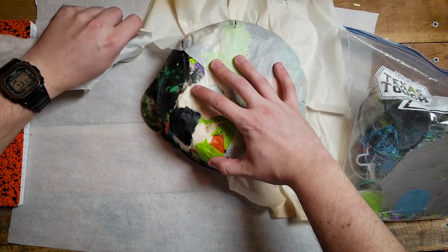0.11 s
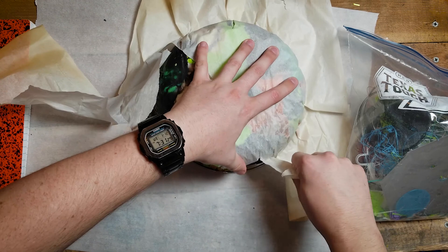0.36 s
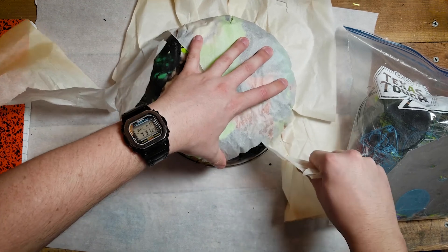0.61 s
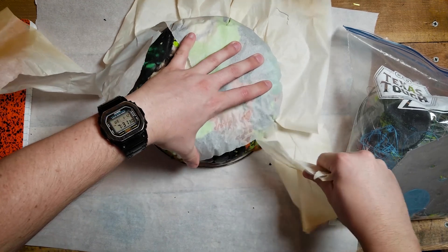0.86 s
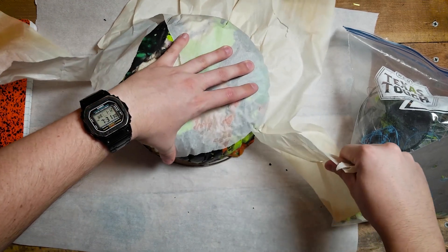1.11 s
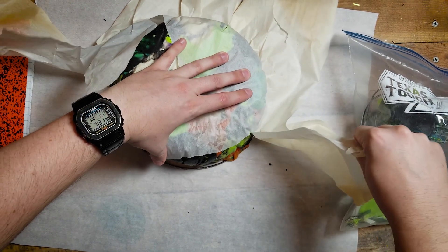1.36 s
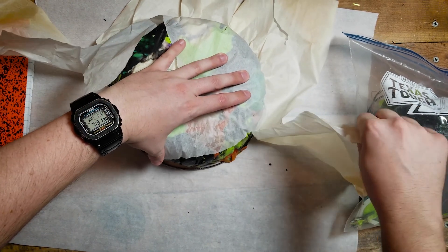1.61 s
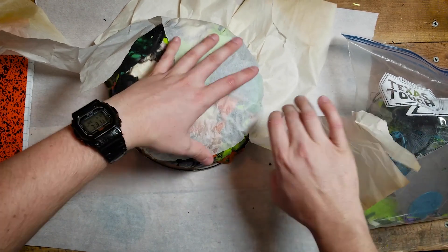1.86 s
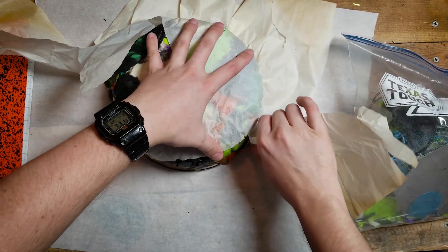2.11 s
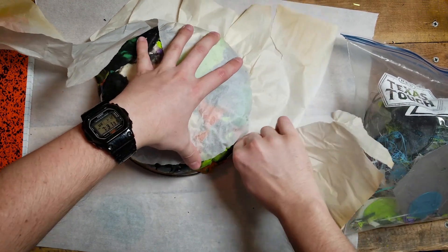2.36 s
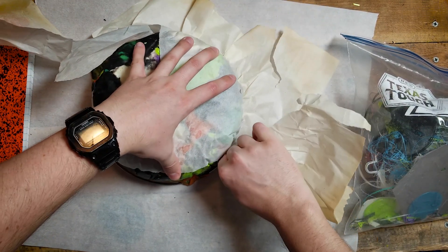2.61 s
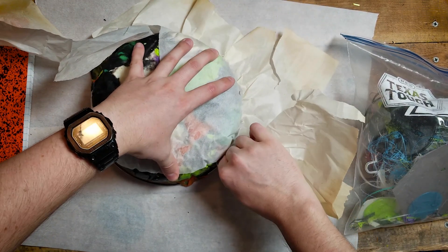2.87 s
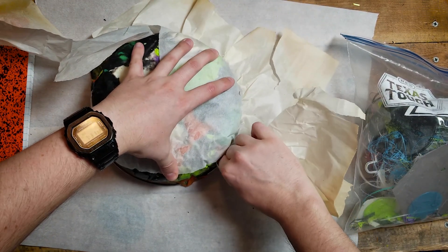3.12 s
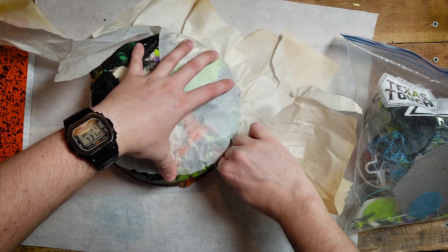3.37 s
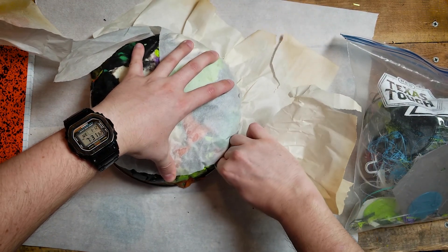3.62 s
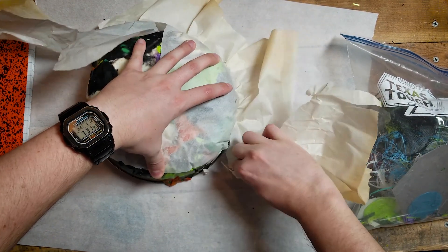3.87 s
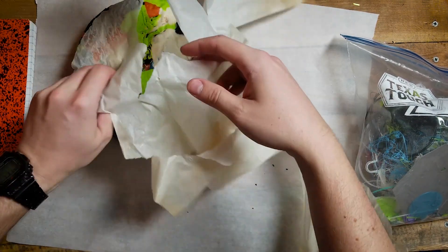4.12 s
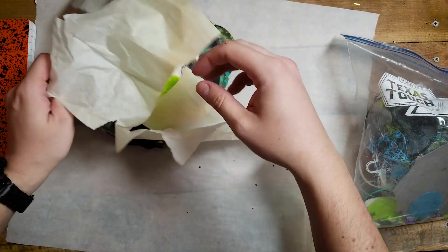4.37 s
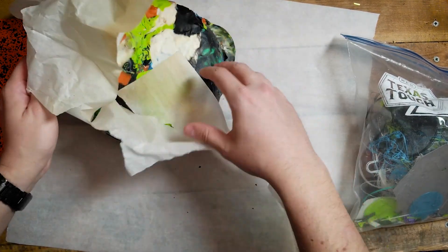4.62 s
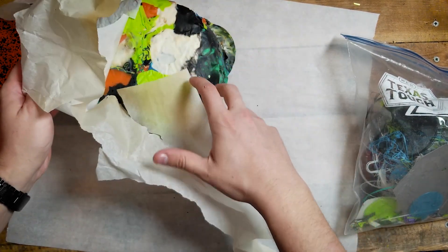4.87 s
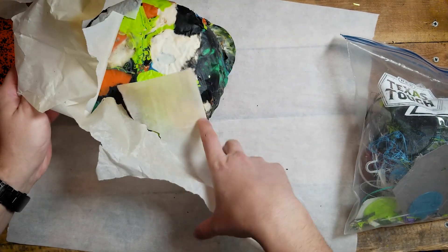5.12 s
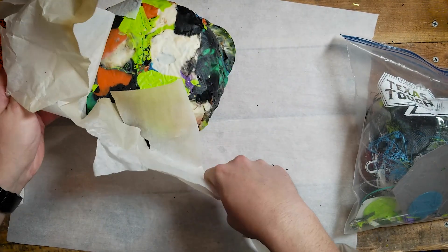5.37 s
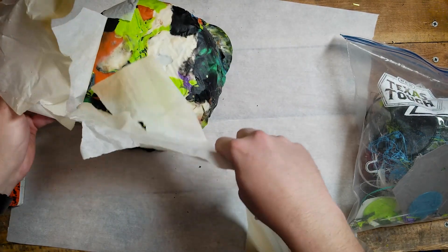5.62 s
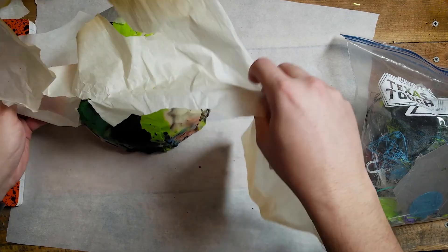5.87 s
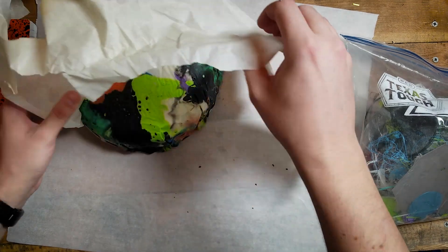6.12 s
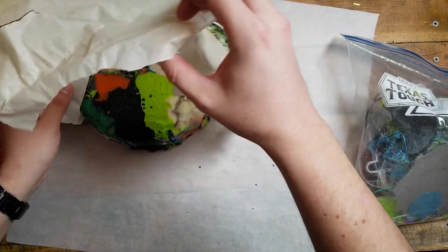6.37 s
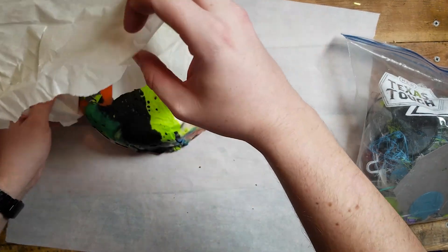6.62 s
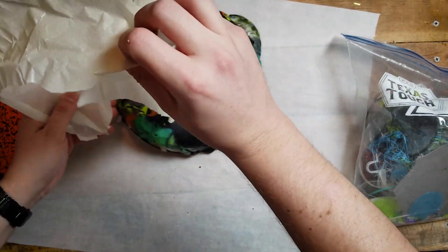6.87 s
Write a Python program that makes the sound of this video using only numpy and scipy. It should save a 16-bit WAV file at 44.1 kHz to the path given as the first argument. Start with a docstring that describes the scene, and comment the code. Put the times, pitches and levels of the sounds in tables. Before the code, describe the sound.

Close, dry paper crinkling with bright snaps and one very loud crack, plus faint low bumps of a bowl shifting on a wooden table.

```python
"""Stiff baking paper is peeled by hand off a hard plastic bowl on a wooden table, heard close up.
Clear snaps and dense crackle: each snap is a pop of a ringing flat facet plus a bright noise tick of the fold.
The bowl slips in jerks that ring low table modes; twice its wall hums as a wavering sine.
Sparse decaying taps add a short room tail to the paper; shaped noise is the still air."""
import sys
import numpy as np
from scipy import signal
from scipy.fft import rfft, irfft, next_fast_len
from scipy.io import wavfile
from scipy.ndimage import uniform_filter1d

SR = 44100
rng = np.random.default_rng(int(sys.argv[2]) if len(sys.argv) > 2 else 0)


def dump_mix(stems):
    """Bounce the given channels to the path in sys.argv[1] as a 16-bit WAV at rate SR."""
    frames = np.atleast_2d(stems).T  # one column per channel
    limited = np.clip(frames, -1, 1)  # hard clip at full scale
    pcm = np.round(limited * 32767).astype(np.int16)
    wavfile.write(sys.argv[1], SR, pcm)


def nominal_scale(level):
    """Amplitude ratio for a level in decibels (scalar or array-like)."""
    x = np.asarray(level, float) / 20
    return 10 ** x


N = 307818

# tugs of the hand, each freeing a crowd of small snaps: (start [s], hold [s], effort [dB], ticks over pops [dB])
HAND_TUGS = [(0.0, 0.042, -31.5, 3.5), (0.125, 0.061, -33, -0.5), (0.288, 0.028, -39.5, 4.5),
             (0.349, 0.076, -29, 2), (0.398, 0.055, -23, 2), (0.487, 0.065, -23, 0.5),
             (0.628, 0.22, -27, 0.5), (0.832, 0.096, -27.5, 0), (0.922, 0.098, -28, 3),
             (1.072, 0.043, -31, 1), (1.163, 0.053, -30, 2.5), (1.273, 0.12, -30.5, 6),
             (1.477, 0.032, -35.5, 4), (1.61, 0.05, -32.5, 1), (1.723, 0.095, -40, -0.5),
             (1.886, 0.13, -65, 14), (1.979, 0.055, -32, -3.5), (2.136, 0.055, -28.5, -1.5),
             (2.254, 0.1, -31.5, -1), (2.381, 0.15, -29.5, -2), (2.583, 0.032, -34, -3.5),
             (2.815, 0.051, -47, -11), (2.932, 0.087, -46, -3.5), (3.108, .03, -45, 4),
             (3.289, .03, -38.5, -17), (3.32, 0.053, -44.5, -19), (3.48, 0.037, -53, 8),
             (3.586, 0.059, -45.5, -3), (3.694, .04, -32, -2), (3.747, 0.048, -17, 0.5),
             (3.928, 0.063, -37.5, -3.5), (4.024, 0.045, -30, -1), (4.09, 0.077, -33, 3),
             (4.177, 0.037, -33, -2), (4.239, 0.12, -31, 2.5), (4.4, 0.1, -42.5, 0.5),
             (4.546, 0.04, -39.5, -2), (4.607, 0.018, -38.5, 4.5), (4.68, 0.098, -40.5, 2.5),
             (4.898, 0.066, -43, 1.5), (4.978, 0.13, -37, 8), (5.143, .15, -34.5, 2.5),
             (5.296, 0.21, -34.5, 3), (5.533, 0.042, -42.5, 6), (5.65, 0.02, -33, -3),
             (5.71, 0.079, -31.5, 2), (5.853, 0.045, -34.5, 1), (5.943, 0.041, -31, 2),
             (6.055, 0.047, -39.5, 0.5), (6.171, 0.072, -30, 3), (6.308, 0.085, -29, 3),
             (6.442, 0.27, -30.5, 3), (6.597, 0.033, -21, 0), (6.705, .08, -34, -0.5),
             (6.822, .17, -32.5, 1)]
# slack of the sheet, favours wide facets over small: (time [s], wide-facet gain [dB])
SHEET_SLACK = [(0.0, 6.5), (.2, -5.5), (.5, 3.5), (1.0, 5), (1.4, 5.5), (1.7, 6.5), (2.1, -6), (2.22, -15),
               (2.3, 7), (2.4, -7), (2.6, -1), (3.0, -2), (3.35, 1), (3.6, -4.5), (4.1, -3), (4.33, 1),
               (4.6, -7), (5.0, -10), (5.3, -3), (5.6, -5), (5.8, -10), (6.1, -8.5), (6.5, -1), (6.98, 0)]
# sharpness of the crease, favours bright ticks over dull: (time [s], tilt [dB])
CREASE_SHARPNESS = [(0.0, -4), (1.3, 3.5), (1.7, -4.5), (2.6, 1.5), (3.2, -1), (3.25, 8), (3.35, -8),
                    (3.66, -4), (3.72, 8), (3.84, 1), (4.0, -2), (6.98, -3.5)]
# borders between wide, middle and small facets: (pitch [Hz])
FACET_BORDERS_HZ = [870, 2500]
# colour of paper and microphone together: (frequency [Hz], gain [dB])
PAPER_COLOUR = [(40, -43), (150, -26.5), (250, -17), (340, -10.5), (480, -6.5), (900, -3.5), (1900, 3.5),
                (2700, 0.5), (3700, 3), (4900, 0.5), (7000, -0.5), (11000, -1.5), (15500, -1.5)]
# shoves of the bowl over the table: (start [s], hold [s], rumble [dB])
BOWL_SHOVES = [(.39, .06, -67), (.48, 0.037, -63), (.61, .04, -55), (.72, 0.056, -59), (.94, 0.027, -48),
               (1.01, 0.014, -39), (1.17, .03, -49), (1.22, .02, -45), (1.28, .02, -44), (1.44, 0.015, -51),
               (1.51, 0.016, -57), (1.63, 0.043, -50), (2.46, 0.044, -54), (3.74, 0.052, -51),
               (4.03, 0.018, -49), (4.24, 0.075, -55), (4.75, .05, -55), (5.65, 0.023, -62),
               (6.33, 0.083, -55), (6.51, 0.04, -55), (6.61, 0.035, -49), (6.73, 0.021, -33),
               (6.8, .03, -41.5), (6.87, 0.017, -36)]
# modes of the table top: (frequency [Hz], width [Hz], relative level [dB])
TABLE_MODES = [(55, 20, -4), (109, 20, 1), (136, 16, -6), (174, 16, -4), (262, 22, -6)]
# spectrum of the still air: (frequency [Hz], relative density [dB per Hz])
AIR_SPECTRUM = [(30, -30), (60, 5), (100, -16), (300, 11), (1000, 9), (4000, 1), (15000, -20)]
# room decay: (frequency [Hz], t60 [s])
ROOM_DECAY = [(400, 0.27), (1500, 0.097), (4000, 0.16), (12000, 0.071)]
# clear snaps, peaks before colouring: (time [s], facet pitch [Hz], pop peak [dB], tick peak [dB])
CLEAR_SNAPS = [(0.117, 1440, -21.5, -12), (0.28, 2110, -26, -18), (0.301, 4480, -31, -11),
               (0.39, 1410, -5.5, -6), (0.418, 1600, -5, -3), (0.511, 1540, -10.5, -13),
               (0.525, 1750, -10, -1), (0.638, 1740, -8, -3), (0.694, 2030, -14, -24),
               (0.743, 1700, -7.5, -5), (0.866, 585, -3.5, -17), (0.893, 1620, -7, -1.5),
               (0.953, 1380, -14, -8), (0.983, 1110, -11, -1.5), (0.99, 1970, -23, -10),
               (1.031, 670, -14, -12), (1.098, 4000, -16, -9), (1.154, 1470, -17, -10),
               (1.168, 526, -10, -6.5), (1.187, 497, -7.5, -9), (1.229, 1650, -12, -10),
               (1.281, 840, -2.5, -5), (1.362, 530, -5, -17), (1.444, 514, -14.5, -42),
               (1.585, 2230, -19.5, -13), (1.653, 3200, -13, -8.5), (1.703, 1690, -20, -11),
               (1.741, 2990, -29, -12), (1.807, 2340, -17.5, -17), (1.936, 2370, -29, -17.5),
               (2.03, 1980, -15.5, -14), (2.115, 3620, -21.5, -22.5), (2.159, 3400, -19, -17),
               (2.261, 3550, -17, -12), (2.286, 780, -9, -19), (2.302, 850, -8.5, -12),
               (2.325, 840, -13, -14), (2.348, 3760, -7, -17), (2.419, 1600, -8.5, -12),
               (2.463, 1960, -14.5, -35), (2.59, 3800, -16.5, -22), (2.624, 2080, -13.5, -22),
               (2.685, 3520, -15, -16), (2.7, 2040, -14, -44), (2.77, 3600, -12.5, -23),
               (2.786, 2070, -19, -14), (2.845, 1780, -27, -24.5), (2.931, 2000, -19, -20),
               (3.069, 3500, -26, -17), (3.075, 3530, -21, -21), (3.104, 2300, -16.5, -23),
               (3.117, 2030, -10.5, -16), (3.147, 1980, -19.5, -31), (3.245, 4140, -19.5, -7.5),
               (3.277, 2290, -14, -27), (3.287, 3280, -18, -19), (3.402, 3460, -10.5, -13),
               (3.443, 3980, -20, -36), (3.466, 2100, -5.5, -14.5), (3.526, 1880, -25, -24),
               (3.581, 3900, -11, -28), (3.685, 2070, -21, -41), (3.692, 3300, -12, -16),
               (3.703, 3680, -9, -2.5), (3.721, 3940, -14, -16), (3.744, 1210, -0.5, 0),
               (4.028, 2020, -12, -17), (4.058, 1220, -22, -11), (4.114, 3600, -8, -16),
               (4.168, 1910, -17.5, -20), (4.248, 1060, -29, -17), (4.319, 1070, -18.5, -9),
               (4.355, 2040, -23, -15), (4.615, 3200, -9.5, -16.5), (4.829, 1980, -22.5, -15),
               (4.918, 1830, -22.5, -14.5), (4.98, 3340, -23, -16.5), (5.012, 3420, -17, -13),
               (5.039, 2970, -19, -18), (5.067, 1440, -25, -10), (5.075, 1870, -16, -16),
               (5.092, 1830, -26, -17), (5.123, 3060, -23, -19), (5.155, 2020, -34, -11.5),
               (5.208, 3870, -12, -6.5), (5.25, 2020, -26, -15), (5.286, 3000, -17, -8.5),
               (5.327, 3560, -15.5, -10.5), (5.36, 2980, -22, -16), (5.375, 3460, -5.5, -5.5),
               (5.405, 3270, -11.5, -33), (5.428, 3400, -20, -19), (5.439, 3400, -29, -13),
               (5.45, 1680, -15.5, -8.5), (5.506, 3460, -10.5, -37), (5.559, 3950, -9, -9),
               (5.616, 2020, -10.5, -8.5), (5.656, 482, -8, -12), (5.681, 2050, -14.5, -33),
               (5.738, 2240, -22, -15), (5.931, 3630, -16.5, -20), (5.958, 1990, -13.5, -8.5),
               (5.962, 2360, -12, -10), (6.078, 2520, -14, -12.5), (6.152, 4080, -17, -21),
               (6.258, 1950, -20, -18), (6.393, 2080, -15, -19), (6.433, 1740, -11.5, -14),
               (6.512, 1110, -9, -5), (6.556, 1170, -10, -11), (6.607, 2260, -18, -23),
               (6.619, 3600, -5.5, -20), (6.762, 1350, -14, -15), (6.793, 2130, -20.5, -6),
               (6.841, 1980, -13.5, -10), (6.885, 1730, -9.5, -15)]
# hums of the bowl wall: (start [s], length [s], mean pitch [Hz], peak [dB])
WALL_HUMS = [(4.22, 0.095, 254, -37.5), (6.505, 0.054, 274, -43)]

TUG_RISE_S = 0.005
WIDE_FALL_DB_PER_S, POP_FALL_DB_PER_S, TICK_FALL_DB_PER_S = 144, 184, 209
AFTER_POP_DB, AFTER_TICK_DB = -30.5, -25  # crowd freed by a clear snap, relative to its peaks
SMALL_DB, SMALL_DB_PER_SLACK_DB = -3.5, -0.39
SHOVE_RISE_S, SHOVE_FALL_DB_PER_S = 0.016, 300
DRAG_DB = -29.5  # drag of the bowl, relative to tug effort
TICK_HZ, TICK_HZ_PER_DB = 10000, 76  # the more a tick leads its pop, the brighter it is
CREASE_HZ_PER_DB = 304

SNAP_T = np.arange(600) / SR
TICK_HIGHPASS = signal.butter(4, 4800, "high", fs=SR, output="sos")


def evened(x):
    """Scales to rms 1."""
    return x / np.sqrt(np.mean(x ** 2) + 1e-20)


def peaked(x):
    """Scales to peak 1."""
    return x / np.max(abs(x))


def read(points, hz):
    """Reads a spectrum on a log-frequency axis."""
    f, value = np.transpose(points)
    return np.interp(np.log(hz + 1), np.log(f + 1), value)


def shaped(x, points):
    """Filters by a spectrum in dB."""
    size = next_fast_len(len(x))
    gain = nominal_scale(read(points, np.fft.rfftfreq(size, 1 / SR)))
    return irfft(rfft(x, size) * gain, size)[:len(x)]


def control(table):
    """Reads a control curve at every sample."""
    return np.interp(np.arange(N) / SR, *np.transpose(table))


def gestures(start, hold, db, rise_s, fall_db_per_s):
    """Each gesture rises, holds and dies away; their powers add to one gain per sample."""
    t = np.arange(0, N / SR + .002, .001)
    since = t[:, None] - start
    fall_db = fall_db_per_s * np.maximum(since - rise_s - hold, 0)
    gain = np.clip(since / rise_s, 0, 1) * nominal_scale(db - fall_db)
    return np.interp(np.arange(N) / SR, t, np.sqrt((gain ** 2).sum(axis=1)))


def decaying_sine(hz, cycles):
    """A mode that dies by 1/e in the given number of cycles."""
    return np.sin(2 * np.pi * hz * SNAP_T) * np.exp(-SNAP_T * hz / cycles)


def pop(hz, chance, cycles=1.9, upper=.8, lower=.35, rough=.55, rough_s=.0016, rise_s=.0004):
    """A facet flips and rings a few cycles, with a higher and a lower mode and a ragged edge."""
    above_hz = hz * (1.357 + 1.33 * abs(np.tanh(chance[0])))
    below_hz = hz / (1.666 + 0.94 * abs(np.tanh(chance[1])))
    ring = decaying_sine(hz, cycles)
    ring = ring + upper * decaying_sine(above_hz, cycles)
    ring = ring + lower * decaying_sine(below_hz, cycles / 2)
    smooth = uniform_filter1d(uniform_filter1d(chance, size=4), size=5)
    ragged = smooth * np.exp(-SNAP_T / rough_s)
    onset = np.minimum(SNAP_T / rise_s, 1)
    return peaked((peaked(ring) + rough * peaked(ragged)) * onset)


def tick(hz, chance, typical_decay_s=0.001, width_hz=4000, rise_s=0.00007):
    """The fold itself cracks: about a millisecond of bright noise around its own centre."""
    band = np.exp(-((np.fft.rfftfreq(len(SNAP_T), 1 / SR) - hz) / width_hz) ** 2 / 2)
    decay_s = typical_decay_s * np.exp(.4 * np.tanh(chance[1]))
    envelope = np.exp(-SNAP_T / decay_s) * np.minimum(SNAP_T / rise_s, 1)
    return peaked(signal.sosfilt(TICK_HIGHPASS, irfft(rfft(chance) * band) * envelope))


def handling():
    """Gains of wide, middle and small facets and of ticks, from tugs, clear snaps and the slack of the sheet."""
    start, hold, effort_db, crisp_db = np.transpose(HAND_TUGS)
    snap_s, _, pop_db, tick_db = np.transpose(CLEAR_SNAPS)
    start, hold = np.r_[start, snap_s], np.r_[hold, 0 * snap_s]
    pops_db = np.r_[effort_db, pop_db + AFTER_POP_DB]
    ticks_db = np.r_[effort_db + crisp_db, tick_db + AFTER_TICK_DB]
    wide = gestures(start, hold, pops_db, TUG_RISE_S, WIDE_FALL_DB_PER_S)
    middle = gestures(start, hold, pops_db, TUG_RISE_S, POP_FALL_DB_PER_S)
    ticks = gestures(start, hold, ticks_db, TUG_RISE_S, TICK_FALL_DB_PER_S)
    slack_db = control(SHEET_SLACK)
    small = np.sqrt(middle * ticks) * nominal_scale(SMALL_DB + SMALL_DB_PER_SLACK_DB * slack_db)
    return wide * nominal_scale(slack_db), middle, small, ticks


def crackle(per_s=2000, spread_db=3.5, clump_db=1.5, bright_db=5.0, region_db=3.5, count=60):
    """Countless small snaps in clumps; a few are much larger, and the facets at work change as the fold travels."""
    clumps = evened(uniform_filter1d(uniform_filter1d(rng.standard_normal(N), size=300), size=300))
    size_db = spread_db * np.minimum(rng.exponential(1, N), 4) + clump_db * clumps
    size = nominal_scale(size_db) * (rng.random(N) < per_s / SR)
    # the hand sets the power over a twentieth of a second
    size = size / np.sqrt(uniform_filter1d(size ** 2, size=2200))
    bright = nominal_scale(bright_db * np.clip(rng.standard_normal(N), -2, 2))
    facet = rng.integers(0, count, N)
    chance = rng.standard_normal((count, 2, len(SNAP_T)))

    # eight pitch regions take changing shares of the power
    regions = evened(uniform_filter1d(rng.standard_normal((N // 1024 + 1, 8)), size=3, axis=0))
    share = nominal_scale(region_db * regions)
    share = share / np.sqrt((share ** 2).mean(axis=1, keepdims=True))
    size = size * share[np.arange(N) // 1024, facet * 8 // count]
    bright = bright * nominal_scale(control(CREASE_SHARPNESS) * np.tanh(chance[facet, 1, 0]))

    parts = np.zeros((4, N))  # wide, middle and small facets, then ticks
    for k, hz in enumerate(np.geomspace(400, 4200, count)):
        train = size * (facet == k)
        group = np.searchsorted(FACET_BORDERS_HZ, hz)
        tick_hz = 9500 + 2500 * np.tanh(chance[k, 1, 0])
        parts[group] += signal.oaconvolve(train, pop(hz, chance[k, 0], upper=0.2))[:N]
        parts[-1] += signal.oaconvolve(train * bright, tick(tick_hz, chance[k, 1]))[:N]
    return sum(gain * evened(part) for gain, part in zip(handling(), parts))


def drag():
    """How hard the bowl drags on the table: the shoves, and a share of every tug."""
    tug_rows = [(s, hold, db + DRAG_DB) for s, hold, db, _ in HAND_TUGS]
    rows = np.r_[BOWL_SHOVES, tug_rows]
    return gestures(*rows.T, SHOVE_RISE_S, SHOVE_FALL_DB_PER_S)


def rumble(slips_per_s=300, spread_db=-1.0):
    """The bowl slips in small jerks that ring the table top."""
    sizes = nominal_scale(spread_db * rng.exponential(1, N)) * np.sign(rng.standard_normal(N))
    jerks = sizes * (rng.random(N) < slips_per_s / SR)
    t = np.arange(8000) / SR
    ring = sum(nominal_scale(db) * np.sin(2 * np.pi * hz * t) * np.exp(-np.pi * width_hz * t)
               for hz, width_hz, db in TABLE_MODES)
    rung = signal.oaconvolve(jerks, ring)[:N]
    rung = drag() * rung / np.sqrt(uniform_filter1d(rung ** 2, size=2500))
    return signal.sosfilt(signal.butter(4, 52, "high", fs=SR, output="sos"), rung)


def still_air(level_db=-56):
    """Steady noise shaped by the spectrum of the still air."""
    return nominal_scale(level_db) * evened(shaped(rng.standard_normal(N), AIR_SPECTRUM))


def room(x, build_s=0.0075, turn_s=.05, count=4):
    """Sparse random-sign taps build up, then die band by band.
    Four random tails take turns at a fixed pace, so no single tail colours the sound."""
    at = np.arange(0, SR // 2 - 20, 20)
    turn = (np.arange(N) / (turn_s * SR)).astype(int) % count
    out = np.zeros(N)
    for k, (shift, sign) in enumerate(rng.random((count, 2, len(at)))):
        taps = np.zeros(SR // 2)
        build = np.minimum(at / (build_s * SR), 1) ** 2
        taps[at + (20 * shift).astype(int)] = np.sign(sign - .5) * build
        hz, t, z = signal.stft(taps, SR, nperseg=128)
        decay = nominal_scale(-60 * t / read(ROOM_DECAY, hz)[:, None])
        tail = signal.istft(z * decay, SR, nperseg=128)[1]
        out += signal.oaconvolve(x * (turn == k), tail / np.linalg.norm(tail))[:N]
    return out


def snaps(lead_s=.0012, lead_db=-21.0, lead_spread_db=9.0):
    """The clear snaps, each with its own facet pitch; the fold starts to give a moment before it breaks."""
    size = len(SNAP_T)
    out = np.zeros(N + size)
    chances = rng.standard_normal((len(CLEAR_SNAPS), 4, size))
    for (s, pop_hz, pop_db, tick_db), (a, b, c, d) in zip(CLEAR_SNAPS, chances):
        crease_db = np.interp(s, *np.transpose(CREASE_SHARPNESS))
        tick_hz = TICK_HZ + TICK_HZ_PER_DB * (tick_db - pop_db) + CREASE_HZ_PER_DB * crease_db
        at = round(s * SR)
        early = round((s - lead_s * (.4 + abs(np.tanh(c[2])))) * SR)
        snap = nominal_scale(pop_db) * pop(pop_hz, a) + nominal_scale(tick_db) * tick(tick_hz, b)
        give = nominal_scale(pop_db) * pop(pop_hz * np.exp(0.12 * c[3]), c) + nominal_scale(tick_db) * tick(tick_hz, d)
        out[at:at + size] += snap
        out[early:early + size] += nominal_scale(lead_db + lead_spread_db * np.tanh(c[4])) * give
    return out[:N]


def hums(waver=0.047):
    """The bowl wall hums briefly as it rubs: a low wavering tone that swells and fades."""
    out = np.zeros(N)
    for s, length_s, hz, db in WALL_HUMS:
        t = np.arange(0, length_s, 1 / SR)
        drift = 1 + waver * evened(uniform_filter1d(rng.standard_normal(8000), size=600))[:len(t)]
        tone = np.sin(2 * np.pi * np.cumsum(hz * drift) / SR)
        out[round(s * SR):][:len(t)] += nominal_scale(db) * np.sin(np.pi * t / length_s) * tone
    return out


def scene():
    """Paper with its room tail, the table, the bowl wall and the still air."""
    paper = shaped(nominal_scale(-2.5) * crackle() + snaps(), PAPER_COLOUR)
    mix = paper + nominal_scale(-10.0) * room(paper) + rumble() + hums() + still_air()
    return mix[None]


def top_cut(x):
    """Nothing passes above the cut-off."""
    return signal.sosfilt(signal.butter(12, 16820, fs=SR, output="sos"), x)


def record(dry):
    """Band limit at 15.9 kHz, then a hard ceiling at full scale."""
    lowpass = signal.firwin(255, 15900, window=("kaiser", 9), fs=SR)
    limited = signal.oaconvolve(dry, lowpass[None], "same")
    mix = np.clip(limited, -1, 1)
    return top_cut(mix)


dry = scene()
out = record(dry)
dump_mix(out)
```